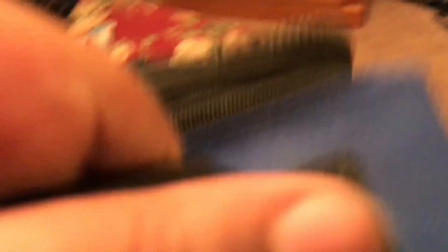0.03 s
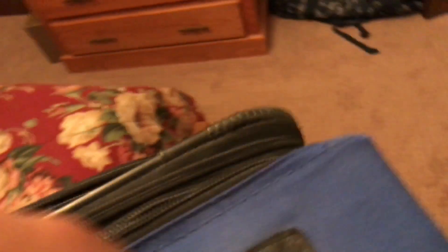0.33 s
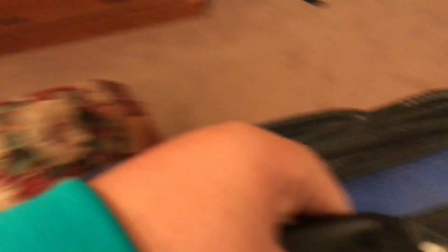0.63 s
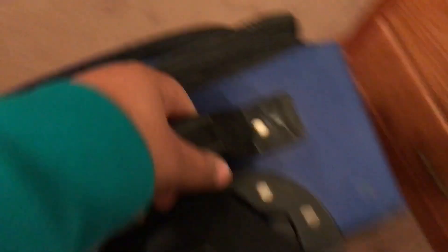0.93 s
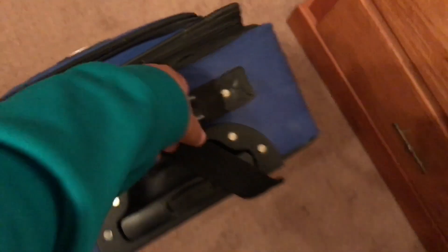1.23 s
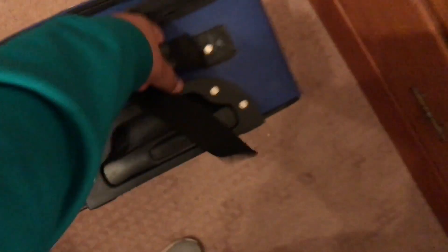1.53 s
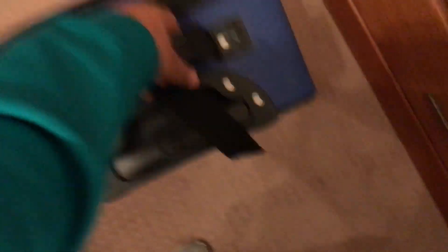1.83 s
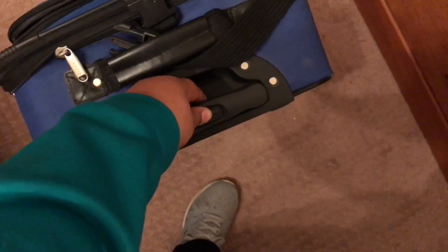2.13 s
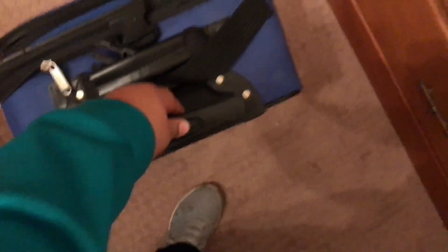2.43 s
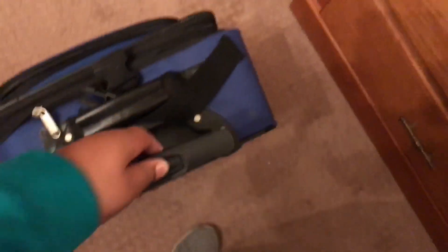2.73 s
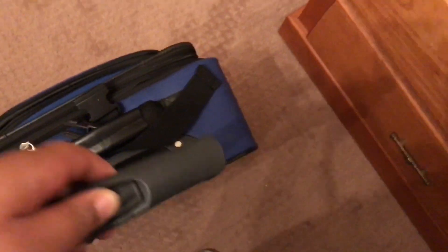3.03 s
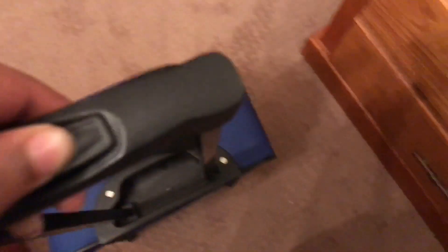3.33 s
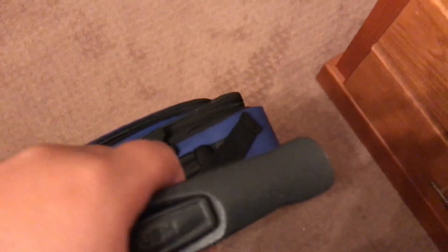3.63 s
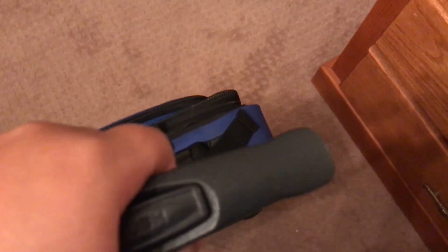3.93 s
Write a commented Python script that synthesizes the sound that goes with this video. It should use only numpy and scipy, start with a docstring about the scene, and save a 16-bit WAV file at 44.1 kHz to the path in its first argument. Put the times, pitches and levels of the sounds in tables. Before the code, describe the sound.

A suitcase's telescoping handle slides up and locks with a loud clack after fabric rustling.

```python
"""A suitcase's telescoping handle slides up with a growing friction hiss, locks with a loud clack that
rings its frame, and rattles in its tubes. Before that, hands rub and bump the soft case, small fittings
tick, and the carrying strap drags and snaps back onto the shell. Blows are decaying bursts of coloured
noise, rubbing is grainy noise. Heard close by in a carpeted bedroom with a faint appliance hum."""
import sys
import numpy as np
from scipy import signal
from scipy.fft import rfft, irfft
from scipy.io import wavfile

SR = 44100
rng = np.random.default_rng(int(sys.argv[2]) if len(sys.argv) > 2 else 0)


def transcribe(signal):
    """Save signal, clipped to [-1, 1], as a 16-bit WAV file at the path in sys.argv[1]."""
    frames = np.atleast_2d(signal).T
    limited = np.clip(frames, -1, 1)
    pcm = np.round(limited * 32767).astype(np.int16)
    wavfile.write(sys.argv[1], SR, pcm)


N = 176400
TIME = np.arange(N) / SR
BLOW_ATTACK_S = 0.00055


def amp(db):
    """Decibels to gain."""
    return 10 ** (np.asarray(db) / 20)


def unit(x):
    """Scale to rms 1."""
    return x / np.sqrt(np.mean(x ** 2) + 1e-20)


def at_hz(points, hz):
    """Interpolate a table on a log-frequency axis."""
    points_hz, values = np.transpose(points)
    return np.interp(np.log(hz + 1), np.log(points_hz + 1), values)


def envelopes(table):
    """Gain over time for each dB column."""
    times_s, *columns_db = np.transpose(table)
    return [amp(np.interp(TIME, times_s, db)) for db in columns_db]


def add(mix, start_s, sound):
    """Mix a sound in at start_s."""
    part = mix[max(round(start_s * SR), 0):][:len(sound)]
    part += sound[:len(part)]


def decay(t, t60_s):
    """Exponential fall of 60 dB in t60_s."""
    return np.exp(-np.log(1000) * t / t60_s)


def drift(cutoff_hz):
    """Low-passed random wander, rms 1."""
    lowpass = np.exp(-(np.fft.rfftfreq(N, 1 / SR) / cutoff_hz) ** 2)
    return unit(irfft(rfft(rng.standard_normal(N)) * lowpass, N))


def colour(x, spectrum, tilt_db_oct=0, peaks=(), size=4096):
    """Minimum-phase filter of unit energy: spectrum, tilt and peaks set the shape only."""
    hz = abs(np.fft.fftfreq(size, 1 / SR))
    db = at_hz(spectrum, hz) + tilt_db_oct * np.log2(np.maximum(hz, 100) / 1000)
    for peak_hz, width_hz, height_db in peaks:
        db += height_db / (1 + (2 * (hz - peak_hz) / width_hz) ** 2)
    response = np.exp(np.conj(signal.hilbert(np.log(amp(db)))))
    taps = np.fft.ifft(response).real[:size // 2]
    return signal.fftconvolve(x, taps / np.linalg.norm(taps))[:len(x)]


def resonate(x, hz, width_hz):
    """Steep resonance at a fixed or gliding pitch, rms 1."""
    carrier = np.exp(2j * np.pi * np.cumsum(hz * np.ones(len(x))) / SR)
    pole = np.exp(-np.pi * width_hz / SR)
    baseband = signal.lfilter([1], np.poly([pole, pole]), x / carrier)
    return unit((carrier * baseband).real)


def blows(table, spectrum, body_db, body_t60_s, peaks=(), attack_s=BLOW_ATTACK_S, size=16384):
    """Impacts: a fast-dying cloud of dense resonances plus a weaker body ring."""
    out, t = np.zeros(N), np.arange(size) / SR
    for start_s, db, tilt_db_oct, t60_s in table:
        shape = np.minimum(t / attack_s, 1) * (decay(t, t60_s) + amp(body_db) * decay(t, body_t60_s))
        blow = colour(shape * rng.choice([-1, 1], size), spectrum, tilt_db_oct, peaks)
        add(out, start_s, amp(db) * blow * np.linalg.norm(shape) / np.linalg.norm(blow))
    return out


def ringing(table, modes):
    """Damped modes struck by each blow, scaled relative to the strongest blow."""
    out, t = np.zeros(N), np.arange(SR) / SR
    top_db = max(row[1] for row in table)
    attack = np.minimum(t / BLOW_ATTACK_S, 1)
    for start_s, db, *_ in table:
        ring = sum(amp(mode_db) * decay(t, t60_s) * np.sin(2 * np.pi * (hz * t + rng.random()))
                   for hz, mode_db, t60_s in modes)
        add(out, start_s, amp(db - top_db) * attack * ring)
    return out


def friction(grain_share, grains_per_s=1100, spread_db=1.5):
    """Smooth rubbing noise plus tiny catches of uneven size."""
    grains = (rng.random(N) < grains_per_s / SR) * rng.standard_normal(N)
    grains *= amp(spread_db * np.minimum(rng.exponential(1, N), 3))
    return np.sqrt(grain_share) * unit(grains) + np.sqrt(1 - grain_share) * rng.standard_normal(N)


# room air (frequency [Hz], relative level [dB])
AIR_SPECTRUM = [(20, -12.5), (45, 7), (90, 3.5), (160, -2.5), (330, -11.5), (550, -16.5), (1000, -20.5),
                (2000, -30.5), (9500, -24), (12500, -21.5), (16000, -36.5)]


def background(air_db=-63, hum_db=-66, hum_hz=263.5, waver_hz=3.9):
    """Quiet room air and a wavering appliance hum."""
    pitch_hz = hum_hz + waver_hz * drift(cutoff_hz=2.5)
    hum = unit(np.sin(2 * np.pi * np.cumsum(pitch_hz) / SR))
    return amp(air_db) * colour(rng.standard_normal(N), AIR_SPECTRUM) + amp(hum_db) * hum


# bedroom decay (frequency [Hz], t60 [s])
ROOM_DECAY = [(100, 0.3), (500, 0.3), (2000, 0.28), (6000, 0.17), (15000, 0.14)]


def reverb(x, level_db=-18, build_s=0.021, size=256):
    """Short diffuse tail, each band dying at its own rate."""
    hz, t, bands = signal.stft(rng.standard_normal(SR), SR, nperseg=size)
    bands = bands * decay(t, at_hz(ROOM_DECAY, hz)[:, None])
    tail = signal.istft(bands, SR, nperseg=size)[1]
    tail *= np.minimum(np.arange(len(tail)) / SR / build_s, 1)
    return amp(level_db) * signal.fftconvolve(x, tail / np.linalg.norm(tail))[:N]


# rubbing (time [s], hiss level [dB], body level [dB])
CLOTH_LEVELS = [(0, -50.5, -44.5), (.055, -47, -37.5), (.095, -55.5, -46.5), (.27, -54.5, -49.5),
                (.33, -50, -45), (.44, -54.5, -47.5), (.51, -46.5, -52), (.57, -63, -62.5),
                (.66, -49.5, -46.5), (.76, -58, -56), (.89, -68.5, -65.5), (1.13, -62, -60),
                (1.42, -68, -67.5), (1.53, -59.5, -64.5), (1.62, -52.5, -60), (1.76, -67, -60),
                (1.89, -57, -61), (2.02, -75.5, -74), (2.25, -72.5, -71), (2.47, -58, -54.5),
                (2.53, -64.5, -63.5), (3.4, -54.5, -59.5), (3.65, -51, -53.5), (3.87, -66, -63.5),
                (4, -73, -67.5)]
# bumps on the case: hands and flaps, then thuds as the handle slides and locks (time [s], level [dB], tilt
# [dB/oct], t60 [s])
BUMP_HITS = [(.036, -26, 4, 0.02), (.049, -34, 5, 0.16), (.271, -27, 2.5, 0.11), (1.556, -30, 0.5, 0.071),
             (1.585, -39, -5.5, 0.18), (2.317, -43, 2.5, 0.089), (3.025, -43.5, 4.5, 0.26),
             (3.135, -43.5, 5.5, 0.097), (3.326, -27.5, 2, 0.15)]
# spectra (frequency [Hz], relative level [dB])
CLOTH_HISS_SPECTRUM = [(300, -37.5), (1200, -1.5), (2200, 4.5), (4000, -1.5), (7000, -4.5), (10000, -10.5),
                       (13000, -5.5), (16000, -10)]
CLOTH_BODY_SPECTRUM = [(20, -14), (100, -3.5), (220, 3.5), (380, 2.5), (560, -3.5), (820, -4), (1120, -4),
                       (1400, -10.5), (1800, -29), (6000, -37.5), (16000, -67)]
BUMP_SPECTRUM = [(30, -8.5), (70, 2), (200, -2.5), (400, -8), (1000, -23), (3000, -44.5), (16000, -70)]


def cloth(flutter_db=3.0):
    """Hand and sleeve rub the fabric shell; hands, flaps and the moving handle bump it."""
    hiss_gain, body_gain = envelopes(CLOTH_LEVELS)
    rub = friction(grain_share=0.4) * amp(flutter_db * drift(cutoff_hz=35))
    rustle = hiss_gain * colour(rub, CLOTH_HISS_SPECTRUM) + body_gain * colour(rub, CLOTH_BODY_SPECTRUM)
    return rustle + blows(BUMP_HITS, BUMP_SPECTRUM, body_db=-24.5, body_t60_s=0.2)


# fittings on the shell (time [s], level [dB], tilt [dB/oct], pitch [Hz])
TICK_HITS = [(0.0642, -39, 0.5, 2500), (0.111, -41, 0, 2670), (0.125, -36, -1, 3870),
             (0.158, -42, -2, 2430), (0.197, -46, 1, 3240), (0.3067, -29, -1, 5800),
             (0.3428, -31, -4, 6000), (0.362, -41.5, 1, 4350), (.378, -36, -1.5, 3740),
             (.399, -48, 13, 7240), (0.425, -41, -3, 3280), (0.5672, -40, 0.5, 3430),
             (0.5764, -36.5, -3, 3700), (0.642, -39.5, 0, 1230), (0.6556, -32.5, 0, 6040),
             (.6684, -38, -3, 3970), (0.7397, -30, 0.5, 6200), (0.7859, -41.5, -0.5, 2090),
             (0.8307, -39.5, 2.5, 3500), (0.842, -40.5, -3, 4170), (1.0826, -40, 1.5, 4280),
             (1.261, -44, -1, 3870), (1.6036, -28.5, 2.5, 6000), (1.6876, -35.5, 0, 5860),
             (1.738, -40.5, -1, 4420), (1.86, -43, -0.5, 3330), (1.9041, -35, 21.5, 7250),
             (1.9447, -44.5, -0.5, 2420), (1.9949, -51.5, -2, 3950), (2.3022, -46, -7.5, 1336),
             (2.363, -38.5, 2.5, 1180), (3.283, -38, -5.5, 1150), (2.468, -43.5, -7, 1120)]
# tick spectrum (frequency [Hz], relative level [dB])
TICK_SPECTRUM = [(60, -23), (350, -9), (800, -8.5), (1100, 4.5), (1380, 1), (1650, -10), (3200, -5.5),
                 (4500, -10.5), (6200, -9.5), (9000, -17), (16000, -31)]


def fittings(t60_s=0.029, width_hz=780, peak_db=9.5):
    """Zip pulls and buckles tick on the shell, each with its own resonance."""
    return sum(blows([(start_s, db, tilt_db_oct, t60_s)], TICK_SPECTRUM, body_db=-22, body_t60_s=0.11,
                     peaks=[(hz, width_hz, peak_db)])
               for start_s, db, tilt_db_oct, hz in TICK_HITS)


# zip pull chinks (time [s], level [dB])
CHINK_HITS = [(0.151, -50), (0.234, -46.5), (0.767, -46), (1.129, -55), (1.904, -46)]


def zip_pull(pitch_hz=7000, t60_s=0.037):
    """A dangling zip pull chinks in one narrow, high band."""
    out, t = np.zeros(N), np.arange(SR) / SR
    for start_s, db in CHINK_HITS:
        ring = resonate(rng.standard_normal(SR), pitch_hz, width_hz=540)
        add(out, start_s, amp(db) * decay(t, t60_s) * ring)
    return out


# strap and tube squeaks (time [s], length [s], pitch [Hz], level [dB])
SQUEAK_TONES = [(1.612, 0.033, 12120, -44.5), (1.614, 0.014, 15400, -43), (3.175, 0.023, 2720, -40.5)]


def squeaks(waver_hz=110):
    """Brief stick-slip gives a wavering tone."""
    out = np.zeros(N)
    for start_s, length_s, hz, db in SQUEAK_TONES:
        n = int(length_s * SR)
        pitch_hz = hz + waver_hz * drift(cutoff_hz=300)[:n]
        tone = np.sin(2 * np.pi * np.cumsum(pitch_hz) / SR)
        add(out, start_s, amp(db) * signal.get_window(("tukey", 0.5), n) * tone)
    return out


# strap drag (time [s], level [dB])
SCRAPE_LEVELS = [(.5, -59.5), (.7, -52), (.92, -66.5), (1.5, -80), (1.66, -63.5), (1.78, -84), (1.88, -58),
                 (2.05, -96)]


def strap_scrape(catch_db=3):
    """The strap drags over the hollow shell in small catches."""
    gain = envelopes(SCRAPE_LEVELS)[0] * amp(catch_db * drift(cutoff_hz=45))
    return gain * resonate(friction(grain_share=0.5), hz=1146, width_hz=280)


# metal snaps, strap slaps (time [s], level [dB], tilt [dB/oct], t60 [s])
SNAP_HITS = [(1.5377, -8, 4.5, 0.017), (1.5735, -16, 2.2, 0.014)]
SLAP_HITS = [(1.5385, -24, -0.5, .035), (1.5516, -15, 0, 0.031), (1.634, -40, 4, 0.056)]
# spectra (frequency [Hz], relative level [dB])
SNAP_SPECTRUM = [(60, -25), (170, -10), (300, 5.5), (500, -9.5), (1100, -2.5), (2200, -15.5), (3100, -0.5),
                 (4200, -14.5), (6000, 3.5), (7200, -12), (8400, -10.5), (10000, -19.5), (16000, -28.5)]
SLAP_SPECTRUM = [(60, -17), (200, -13.5), (380, -8), (660, -7.5), (850, -4.5), (1100, 0), (1400, -16.5),
                 (3000, -23.5), (6000, -32), (16000, -38.5)]
# case modes (frequency [Hz], level [dB], t60 [s])
CASE_MODES = [(323.5, -23, 0.081), (640, -13, 0.035), (1096, -23.5, 0.043), (1237, -32.5, 0.17),
              (3350, -35.5, .18)]


def strap_snap():
    """The strap's metal ends hit their stops; the strap slaps the case and rings it."""
    snaps = blows(SNAP_HITS, SNAP_SPECTRUM, body_db=-18.5, body_t60_s=0.11)
    slaps = blows(SLAP_HITS, SLAP_SPECTRUM, body_db=-13.5, body_t60_s=0.2)
    return snaps + slaps + ringing(SLAP_HITS, CASE_MODES)


# sliding tubes (time [s], hiss level [dB], ring gain [dB])
SLIDE_LEVELS = [(2.3, -78, -95), (2.4, -62, -73.5), (2.5, -56.5, -60), (2.68, -53, -64),
                (2.82, -48.5, -55.5), (2.97, -51, -57), (3.08, -47.5, -50.5), (3.2, -46.5, -47.5),
                (3.315, -35, -41), (3.35, -63, -63), (3.45, -94.5, -95)]
# spectra (frequency [Hz], relative level [dB])
SLIDE_HISS_SPECTRUM = [(200, -3), (800, -5), (1500, 0.5), (2200, -9.5), (4300, -0.5), (6200, 1), (7500, -4),
                       (9300, 2), (10400, -4), (11500, 1.5), (16000, -0.5)]
HOLLOW_SPECTRUM = [(40, -3.5), (110, 6), (430, 2), (540, -7), (680, 8), (880, -18), (1400, -8),
                   (2300, -6.5), (3800, -3.5), (5600, -12), (7200, -16.5), (16000, -35)]
# tube resonances (start [Hz], end [Hz], width [Hz], relative level [dB])
TUBE_GLIDES = [(3220, 2800, 640, -6), (4200, 4300, 900, -7), (5300, 6000, 600, -7), (6250, 6440, 400, -12)]


def handle_slide(glide_span_s=(2.7, 3.22), flutter_db=1.0, chatter_db=2, swell_db=1.5):
    """The tubes hiss through their guides; their resonances glide and swell as they come out."""
    hiss_gain, ring_gain = envelopes(SLIDE_LEVELS)
    flutter = amp(flutter_db * drift(cutoff_hz=30))
    hiss = flutter * colour(friction(grain_share=0.054), SLIDE_HISS_SPECTRUM)
    chatter = amp(chatter_db * drift(cutoff_hz=28.2))
    ring = chatter * colour(friction(grain_share=0.2), HOLLOW_SPECTRUM)
    for start_hz, end_hz, width_hz, db in TUBE_GLIDES:
        pitch_hz = np.interp(TIME, glide_span_s, [start_hz, end_hz])
        gain = amp(db + swell_db * drift(cutoff_hz=12))
        ring += gain * resonate(rng.standard_normal(N), pitch_hz, width_hz)
    return hiss_gain * hiss + ring_gain * ring


# handle rattles (time [s], level [dB], tilt [dB/oct], t60 [s], pitch [Hz])
RATTLE_HITS = [(3.409, -28.5, 2, 0.011, 4930), (3.487, -20, 2, 0.029, 5600),
               (3.4952, -24, -3.5, 0.046, 1050), (3.5, -17, -1, 0.017, 2470),
               (3.536, -43, -1.5, 0.067, 4120), (3.585, -37, 21, 0.023, 5530),
               (3.605, -39, -2, 0.031, 2480), (3.644, -39.5, -3.5, 0.088, 2570),
               (3.688, -30.5, 0, 0.021, 6800), (3.776, -47.5, -4.5, 0.19, 900),
               (3.826, -43.5, 4.5, 0.028, 3030), (3.908, -39, -0.5, 0.026, 1730)]
# rattle spectrum (frequency [Hz], relative level [dB])
RATTLE_SPECTRUM = [(60, -21), (400, -14), (1000, -4), (1450, -5.5), (2000, 0.5), (3400, -4), (5600, -3.5),
                   (7200, -16.5), (10000, -16.5), (16000, -31)]


def handle_rattle(width_hz=620, peak_db=12):
    """The raised handle knocks about in its tubes, each knock with its own resonance."""
    return sum(blows([hit], RATTLE_SPECTRUM, body_db=-14, body_t60_s=0.086,
                     peaks=[(hz, width_hz, peak_db)])
               for *hit, hz in RATTLE_HITS)


# tubes on their stops (time [s], level [dB], tilt [dB/oct], t60 [s])
CLACK_HITS = [(3.3228, 0, -0.05, 0.039), (3.3295, -5, -1.2, 0.03), (3.34, -13, 4, 0.036)]
# clack spectrum (frequency [Hz], relative level [dB])
CLACK_SPECTRUM = [(40, -29.5), (160, -16.5), (230, -1), (320, -3.5), (400, 2), (470, -8.5), (540, -0.5),
                  (730, -3), (880, -13.5), (1150, -6.5), (1550, -14.5), (1800, -5), (2200, -18.5),
                  (2800, -7), (3400, -14.5), (4600, -12), (6200, -14), (9000, -18.5), (16000, -20.5)]
# handle frame modes (frequency [Hz], level [dB], t60 [s])
FRAME_MODES = [(215, -20, 0.16), (282.4, -20.5, 0.13), (397, -12.5, 0.061), (541, -14, 0.06),
               (723.6, -15, 0.082), (1090, -38.5, 0.11), (1760, -33.5, 0.1), (2503, -26, 0.12),
               (2815, -20.5, 0.072), (3908, -49, 0.18), (6298, -43, .3), (6480, -39.5, .4),
               (6550, -33.5, 0.36)]


def handle_lock():
    """The two tubes hit their stops; the first blow rings the frame."""
    clacks = blows(CLACK_HITS, CLACK_SPECTRUM, body_db=-22, body_t60_s=0.17, attack_s=0.00084)
    return clacks + ringing(CLACK_HITS[:1], FRAME_MODES)


def scene():
    """The suitcase in its room, mono."""
    case = cloth() + fittings() + zip_pull() + strap_scrape() + strap_snap()
    case += handle_slide() + squeaks() + handle_rattle() + handle_lock()
    return (case + reverb(case) + background())[None]


# level dip (time [s], gain [dB])
LEVEL_DIP = [(2.003, -0.5), (2.015, -18), (2.022, -20), (2.034, -4.5)]


def record(dry, cutoff_hz=16100):
    """The level dips briefly and returns a little lower; soft overload on the clack; low-pass."""
    dipped = dry * envelopes(LEVEL_DIP)[0]
    clipped = dipped / (1 + dipped ** 4) ** 0.25
    lowpass = signal.firwin(401, cutoff_hz, window=("kaiser", 8), fs=SR)
    return signal.oaconvolve(clipped, lowpass[None], "same")


dry = scene()
out = record(dry)
transcribe(out)
```